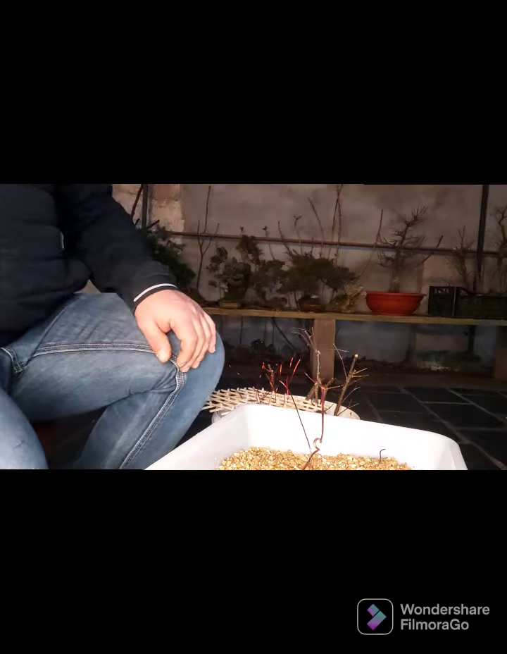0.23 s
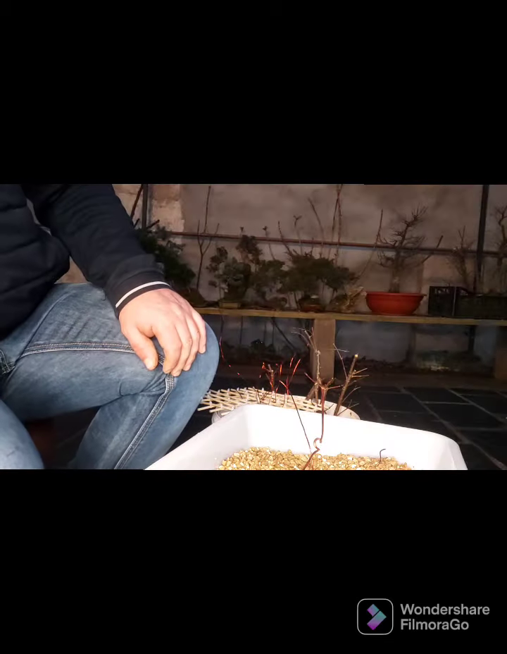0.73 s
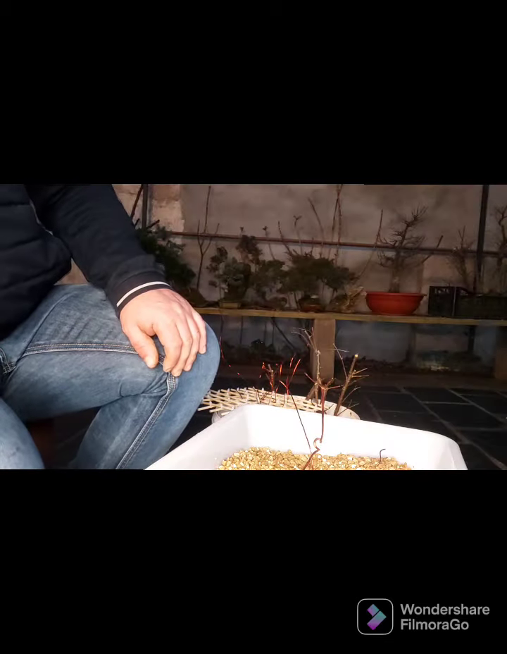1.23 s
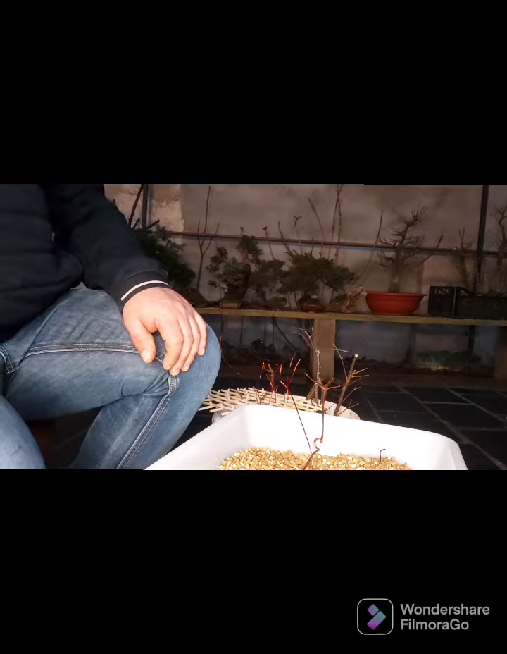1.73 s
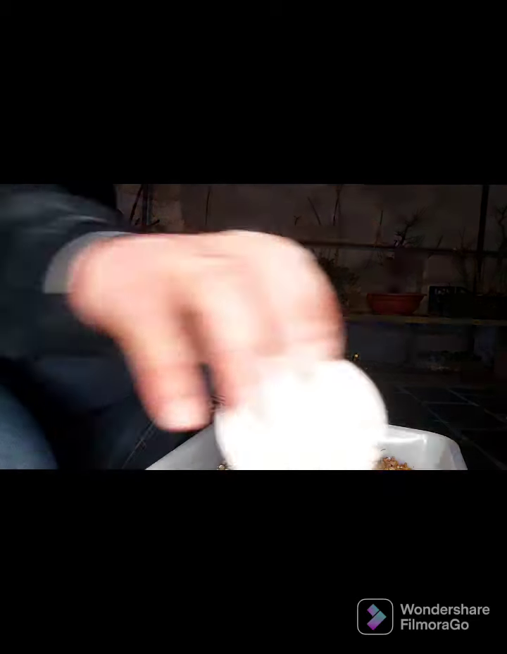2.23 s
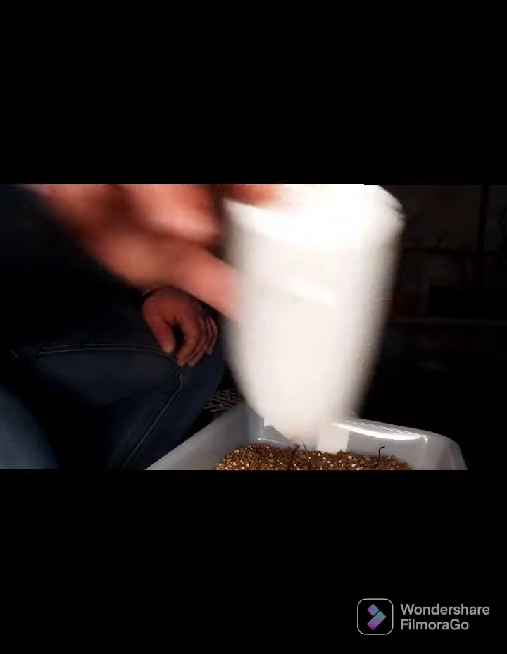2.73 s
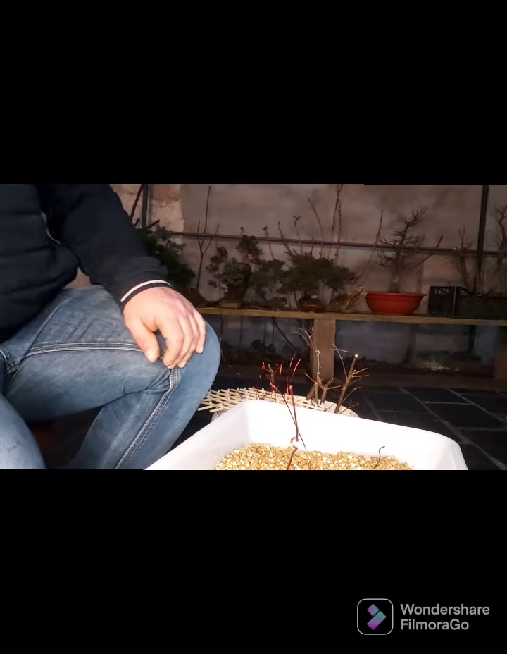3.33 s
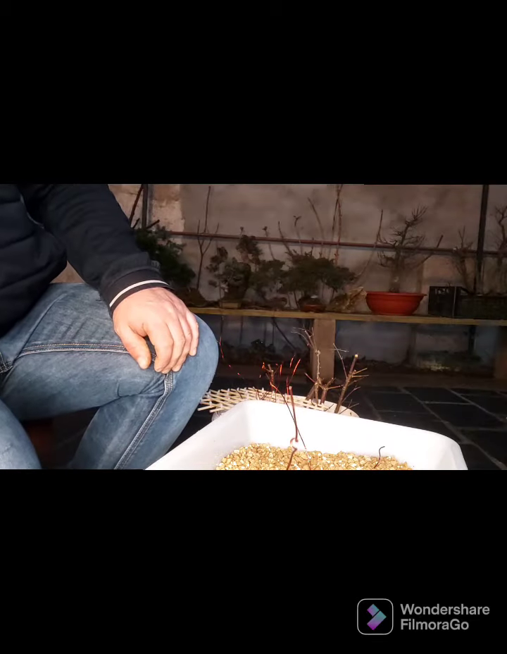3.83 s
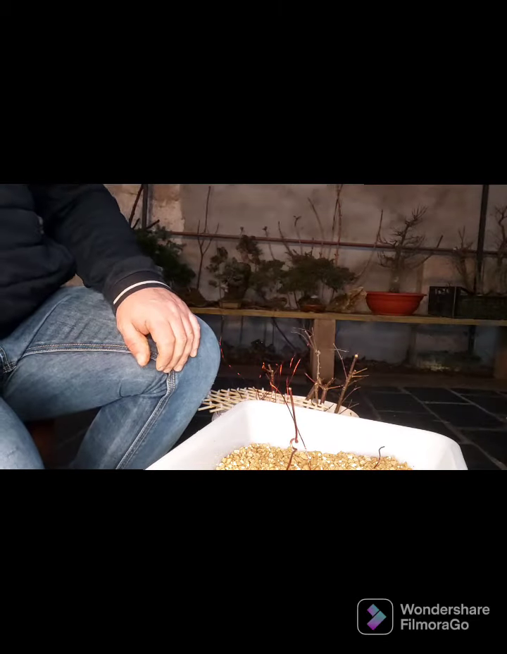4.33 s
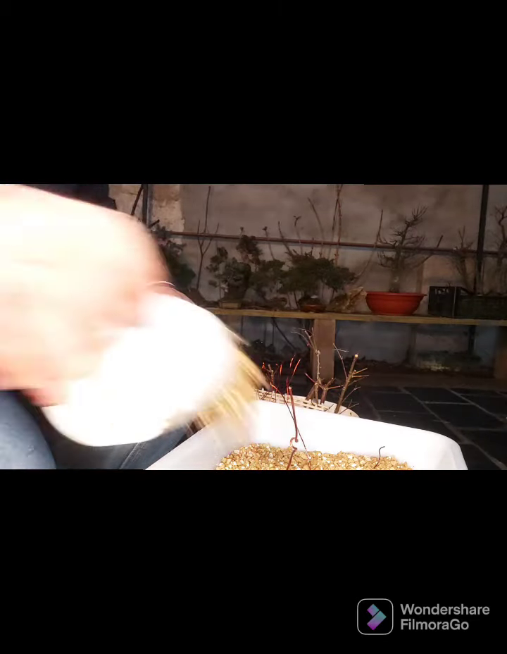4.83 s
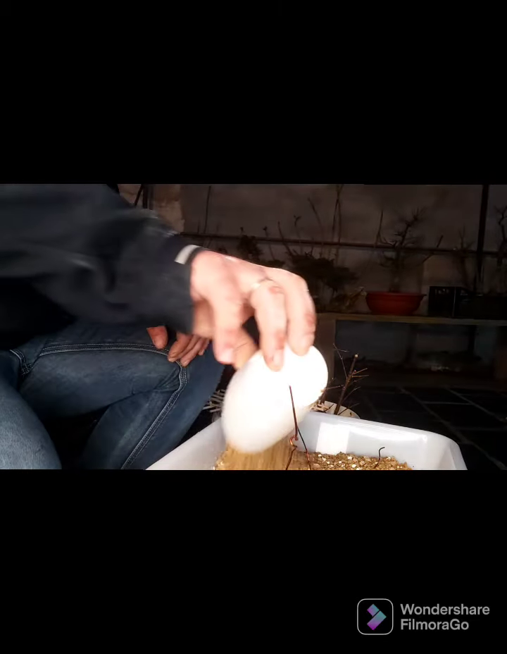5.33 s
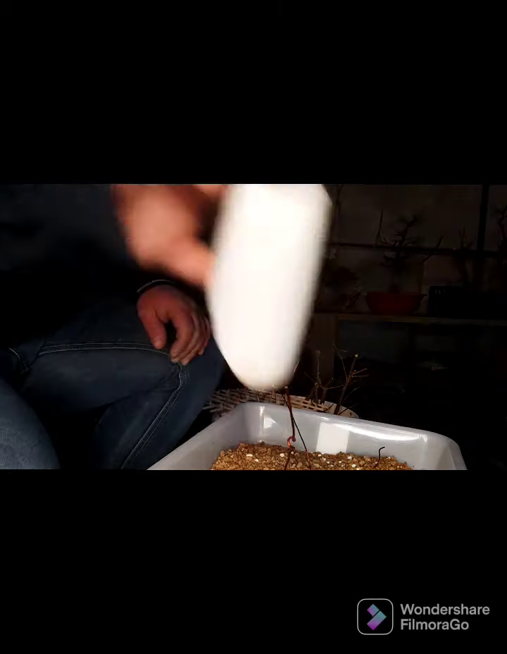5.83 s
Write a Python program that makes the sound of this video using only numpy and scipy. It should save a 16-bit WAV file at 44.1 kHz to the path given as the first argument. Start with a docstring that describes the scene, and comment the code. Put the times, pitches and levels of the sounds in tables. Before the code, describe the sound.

Two rounds of digging coarse dry grit with a hollow plastic scoop and pouring it out in a rattling rush and fading hiss, in a quiet room.

```python
"""Scooping gritty granules, twice over

A plastic scoop crunches into a tub on the left: clumped random collisions, a moving boom and modal knocks.
It trickles as it is carried, then tips into a plastic tray in front: a rattling rush, then a soft hiss
as the rest slides out, both made of dense collisions. Single noise cracks are the hard hits.
Filtered noise is the quiet room, with a low hum that fades away.
"""
import sys
import numpy as np
from scipy import signal
from scipy.fft import rfft, irfft, next_fast_len
from scipy.io import wavfile

SR = 44100
rng = np.random.default_rng(int(sys.argv[2]) if len(sys.argv) > 2 else 0)


def bounce(signal):
    """Save signal as a 16-bit WAV file at the path given by the first command-line argument."""
    frames = np.transpose(np.atleast_2d(signal))
    limited = np.clip(frames, -1, 1)
    pcm = np.round(limited * 32767).astype(np.int16)
    wavfile.write(sys.argv[1], SR, pcm)


N = 267775
TIME = np.arange(N) / SR

# In every pan_db column, positive is louder on the left. Levels are relative, ahead of the room and the final mix.

# dull background with a hum that fades away: start_s, air_db, rumble_db, hum_db
BACKGROUND = [(0, -43, -48, -43.5), (0.5, -48.5, -54, -50.5), (1.3, -47, -50.5, -48),
              (1.7, -49, -50.5, -53), (2.1, -50.5, -46, -52), (2.35, -50, -51, -62), (3.4, -51.5, -47, -62),
              (4.3, -51.5, -53, -61.5), (6.07, -50.5, -50.5, -69)]
# colour of the room: pitch_hz, gain_db
ROOM_COLOUR = [(15, -44), (32, -20), (39, 5), (45, 11.5), (62, 3), (110, -11.5), (146, -5), (190, -5.5),
               (264, -9), (480, -15), (978, -10), (2600, -24), (3300, -34), (8100, -34.5), (15000, -78.5)]
# side of the room: pitch_hz, pan_db
ROOM_SIDE = [(60, 9.5), (150, 11.5), (380, 8), (950, 7.5), (1800, 4.5), (3200, 1), (6500, -0.5),
             (8300, 15.5), (15000, -18)]
# how alike the two ears are in the room: pitch_hz, likeness (-1 to 1)
ROOM_LIKENESS = [(60, 0.78), (180, 1), (550, 0.15), (1000, -0.37), (1700, 0.32), (4000, -0.33)]
HUM_HZ = 95.1

# sways of the carried scoop that shift its loose granules: peak_s, level_db
SWAYS = [(0.03, -52.5), (0.5, -63.5), (1.2, -55), (1.45, -55), (2.23, -52), (3.41, -63), (4.13, -53),
         (4.37, -54), (4.97, -58)]
# colour of the loose granules in the scoop: pitch_hz, gain_db
TRICKLE_COLOUR = [(1800, -14.5), (3000, -6.5), (5200, -9.5), (6800, -2), (8230, 1), (8950, -6.5),
                  (9730, -17.5), (15000, -28)]
# side of the loose granules in the scoop: pitch_hz, pan_db
TRICKLE_SIDE = [(2000, 5), (4500, 3.5), (6700, -2), (8300, 14.5), (10500, 16.5), (15000, 3)]
SWAY_RISE_DB_PER_S, SWAY_FALL_DB_PER_S = 52, 50
STRAY_PER_S, STRAY_DB = 22, -5.0  # lone granules hopping in the scoop, relative to the trickle

# single hard granule hits: start_s, level_db, pan_db, hollow_db, top_db (above TOP_HZ)
HITS = [(0.033, -33.5, -4, 15.5, -13), (0.078, -18, 4.5, -1, -11), (0.185, -20.5, 6, -8, 2),
        (0.533, -35, 11, -19, 10), (0.574, -35, 9, -8, 2), (0.604, -29.5, 8, -21, 4),
        (0.6236, -28, 12, -16, -6), (0.6459, -11, 4, -17, -9), (0.662, -31, 10, -17, -9),
        (0.6825, -21, 7, -12, -9), (0.696, -11, 14, -11, -9), (0.7422, -7, 6, -15, -12),
        (0.7514, -8, 5, 3, -15), (0.9077, -28, 5, 0, -6), (0.921, -23, 4, 3, -6), (0.954, -17, 12, -2, -3),
        (0.939, -21.5, 8, 8, 6), (1.093, -29, 6, 7, -3), (1.2646, -36, -2, -4, 2), (1.4333, -34, 17, -6, 5),
        (1.4612, -37, -2, -1, 6), (1.477, -46, 10, -6, 2), (1.506, -40, 17, -12, 13),
        (1.5524, -45, 18, -10, 16), (1.6128, -44, 16, -10, 13), (1.628, -45, 12, -10, 7),
        (1.6414, -37.5, 14, -6, 6), (1.6863, -44, 10, -1, 6), (1.695, -39, 13, -10, 9),
        (1.7322, -42.5, 15, -10, 14), (1.8085, -42, 17, -6, 11), (1.841, -46, 14, -8, 2),
        (1.9281, -53, 13, -8, 2), (2.243, -25, 0, -3, 4), (2.249, -10, 6, -2, 10.5),
        (2.266, -4, -11, 2, -3), (2.2712, -6, -1, 3.5, -5), (2.2832, -7.5, -11, 5, 5),
        (2.3055, -13, 2, 4, 10.5), (2.3395, -17.5, 5, 17, 5), (2.3628, -30, 7, 21.5, 4),
        (2.4254, -14.5, 6, 1.5, 10), (2.583, -21, 2, -6, -0.5), (2.651, -27.5, -4, -10, -4),
        (2.697, -34, -9, -18, -3), (2.7222, -22, -14, -6, -2.5), (2.873, -38, 3, 6, 10),
        (2.886, -55, 0, 3, 0), (2.901, -37, 3, -5, -1), (3.011, -44.5, -6, -4, -7), (3.4305, -8, 11, 1, -9),
        (3.5642, -10, 10, -36, -7), (3.571, -16, -1, -19, -13), (3.6249, -6.5, 14, -9, -15),
        (3.634, -8.5, 9, -6, -10), (3.669, -17, 7, -1, -9), (3.843, -17.5, 9, 5, -4),
        (4.008, -32, 7, -1, -6), (4.3245, -40, 8, 4, 13), (4.5967, -46, 19, -8, 14),
        (4.6393, -45, 15, -12, 17), (4.863, -42, 15, -8, 2), (4.9227, -37, 6, -6, -6),
        (4.9364, -33, 7, 10, 9), (4.9638, -36, -4, 4, -7), (5.011, -25, 10, 7, -6),
        (5.0288, -17.5, 1, 8, 2), (5.038, -18, 15, -17, -3), (5.0498, -15, -9, 8, -4),
        (5.0613, -6, 2, 4, 0), (5.0769, -14, 3, -6, 2), (5.084, -8.5, 2, -26, 6), (5.092, -13, 8, -10, 5),
        (5.0973, -16.5, 4, -9, 4), (5.102, -27, -1, 16, 4), (5.135, -21, 11, -5, -6),
        (5.159, -26, -3, 7, 9), (5.197, -16.5, -3.5, -0.5, 4), (5.3268, -28.5, 8, -18, 5),
        (5.35, -25, 4, -7, -5), (5.375, -25, 6, -16, 6), (5.541, -31, 1, 0, 0), (5.582, -17, 1, -2, 1),
        (5.68, -27, -2, -6, -4)]
# air column of the scoop: pitch_hz, width_hz, level_db
SCOOP_MODES = [(602, 85, 5.5), (1113, 120, 8.5), (1690, 350, 3), (2223, 180, -3.5)]
SCOOP_PITCH_SPREAD = 0.026  # the air resonances shift with the load and the hand, from hit to hit
CROSSOVER_HZ, TOP_HZ = 2000, 10000  # hollow below and gritty above the first; top above the second

# pushes of the scoop through the heap in the tub:
# start_s, length_s, crunch_db, boom_db, grit_db, grit_fall_db_per_s
STROKES = [(0.645, 0.13, -31.5, -27, -22.5, 596), (0.792, 0.14, -37, -38, -33.5, 74.5),
           (0.893, 0.046, -35.5, -53, -28.5, 188), (1.058, 0.061, -47.5, -44, -42.5, 153),
           (3.481, 0.036, -46, -53, -39.5, 900), (3.556, 0.12, -37, -26.5, -24.5, 417),
           (3.662, 0.19, -32.5, -48.5, -30, 98), (3.8, 0.019, -46, -34.5, -37, 110)]
# the hollow between scoop and heap sinks in pitch as the scoop goes in and rises as it lifts: time_s, pitch_hz
BOOM_PITCH = [(0.66, 855), (0.71, 824), (0.77, 750), (0.83, 614), (0.87, 806), (0.94, 1140), (1.03, 800),
              (3.51, 900), (3.62, 860), (3.71, 760), (3.81, 584), (3.845, 1080), (3.87, 1020), (3.91, 740)]
# colour of the tub: pitch_hz, gain_db
DIG_COLOUR = [(59, -36), (110, -25.5), (165, -9), (230, -4), (320, -13), (410, -5), (610, -9), (760, -6.5),
              (1000, -4.5), (1400, -9), (2050, -8), (2750, -8.5), (3800, -12.5), (5000, -10), (6100, -11),
              (6850, -3.5), (7450, -8), (8250, -2.5), (8850, -9), (9800, -22.5), (16000, -43.5)]
# side of the tub: pitch_hz, pan_db
DIG_SIDE = [(60, 8.5), (200, 19), (650, 11.3), (1290, 11.7), (2400, 8), (4400, 7.8), (6700, 1.6),
            (8300, 22), (10500, 4.7), (15000, 14)]
GRIT_ATTACK_S, CRUNCH_ATTACK_S = 0.022, 0.054  # the surface grinds at once; the heap takes longer to give
CRUNCH_RELEASE_DB_PER_S = 327
AFTERSLIP_DB, AFTERSLIP_DB_PER_S = -15.5, 37  # the heap goes on slumping after a push
STONES_PER_S, STONES_DB = 150, -2.5  # larger stones knocking in the heap, relative to the fine grinding
NEAR_WALL_S = 0.008  # range of echo delays between the plastic walls
SCOOP_MOVES_HZ = 2.5  # rate of the drift in those echoes

# the scoop knocking on plastic and jolting through the heap:
# start_s, level_db, contact_s, pitch_ratio (of the spot struck), pan_db
KNOCKS = [(0.650, -25.5, 0.0014, 0.92, 15), (0.683, -23, 0.00064, 0.94, 15),
          (0.709, -20.5, 0.00073, 0.91, 15), (0.726, -19, 0.00054, 0.91, 15),
          (0.743, -28.5, 0.0012, 0.88, 15), (0.769, -15, 0.0015, 0.846, 16), (0.826, -22, 0.002, 0.63, 15),
          (0.937, -25, 0.0011, 1.23, 12), (3.431, -28, 0.00063, 1.14, 20), (3.437, -19.5, 0.0019, 0.93, 14),
          (3.5095, -22, 0.00042, 0.9, 15), (3.564, -25.5, 0.00041, 0.88, 15),
          (3.627, -17.5, 0.001, 0.93, 16), (3.661, -14, 0.0016, 1.17, 17),
          (5.0671, -30.5, 0.00069, 0.71, 6), (5.1605, -36, 0.00073, 0.75, 6),
          (5.617, -35.5, 0.00074, 0.94, 8)]
# ringing of the plastic tub and tray: pitch_hz (before the ratio), level_db, t60_s
TUB_MODES = [(206, -16, 0.15), (740, -18, 0.023), (922, -3, 0.03), (1000, -7.5, 0.049)]

# rushes of granules out of the tipped scoop:
# start_s, rise_s, length_s, patter_db, grit_db, patter_fall_db_per_s, grit_fall_db_per_s
RUSHES = [(2.243, 0.037, 0.042, -30.5, -23, 75, 230), (2.34, 0.079, 0.097, -56, -43.5, 90, 220),
          (2.676, 0.1, 0.085, -44, -37, 119, 154), (5.024, 0.046, 0.056, -37.5, -28, 260, 476),
          (5.12, 0.039, 0.047, -49.5, -45, 200, 301), (5.32, 0.037, 0.026, -68, -44, 103, 96),
          (5.488, 0.089, 0.095, -54, -36, 42.5, 109)]
# the rest of the load sliding out: start_s, fullest_s, hold_s, fall_10_db_s (sign has no effect),
# patter_db, grit_db, build_db_per_s, pan_db
SLIDES = [(2.269, 2.565, 0.12, -0.0468, -52, -34, 52, -3.5),
          (5.055, 5.586, 0.083, 0.14, -43, -34.5, 45.5, -0.5)]
# colour of the tray: pitch_hz, gain_db
POUR_COLOUR = [(88, -31), (170, -17.5), (376, -14), (600, -14.5), (1100, -11), (2300, -8), (3200, -4),
               (4950, -3), (7040, 5.5), (8600, 1.5), (10000, -18), (14800, -29), (16000, -50)]
# side of the tray: pitch_hz, pan_db
POUR_SIDE = [(200, 1), (600, 8.5), (1100, 5), (2000, 1.5), (4500, -1), (6700, -11.5), (8300, 8),
             (11000, 0.5)]
RUSH_PAN_DB = 7
PATTER_LAG_S = 0.061  # the scoop rings most when nearly empty
THIN_FLOW_PAN_DB = 6.5  # a thin stream falls to the left of the full one
SURGE_DB, SURGE_HZ = 1.0, 14  # the load slips out in small uneven surges
PEBBLES_PER_S, PEBBLES_DB = 100, -3.5  # coarser pebbles in the stream, relative to the fine granules

# dull thuds of the whole plastic vessel taking a load: start_s, peak_db, pan_db
THUDS = [(2.259, -40, 7), (3.433, -22, 15), (5.057, -43.5, 1)]
THUD_HZ, THUD_SAG_HZ_PER_S, THUD_SWELL_S, THUD_WIDTH_S = 208, 1100, 0.015, 0.0092

CUTOFF_HZ = 16000


def from_db(db):
    """Decibels to gain."""
    return 10 ** (np.asarray(db) / 20)


def rms(x):
    """Effective level, never quite zero."""
    return np.sqrt(np.mean(x ** 2) + 1e-20)


def unit(x):
    """Scale a stereo pair so that the mean of its ears has rms 1."""
    return x / rms(x.mean(axis=0))


def at_hz(points, hz):
    """Read a table of pitch_hz and value on a log axis."""
    known_hz, value = np.transpose(points)
    return np.interp(np.log(hz + 1), np.log(known_hz), value)


def in_time(rows):
    """Each column of a table as a curve over time."""
    s, *columns = np.transpose(rows)
    return [np.interp(TIME, s, column) for column in columns]


def panned(db):
    """Left and right gains with a mean of 1."""
    left = 2 / (1 + from_db(-np.atleast_1d(db)))
    return np.array([left, 2 - left])


def drift(rate_hz):
    """Slow chance with rms 1: noise through two equal low-pass poles, drawn at every 40th sample."""
    r = np.exp(-80 * np.pi * rate_hz / SR)
    noise = rng.standard_normal(N // 40 + 2002)
    slow = signal.lfilter([1], [1, -2 * r, r * r], noise)[2000:]  # skip the filter's start-up
    return np.interp(np.arange(N) / 40, np.arange(len(slow)), slow / rms(slow))


def coloured(x, colour, side):
    """Causal (minimum-phase) filter for each ear, built by folding the cepstrum."""
    size = 2 * next_fast_len(N // 2 + SR // 8)
    hz = np.arange(size // 2 + 1) * SR / size
    gain = from_db(at_hz(colour, hz)) * panned(at_hz(side, hz))
    cepstrum = irfft(np.log(gain))
    cepstrum[:, 1:size // 2] *= 2
    cepstrum[:, size // 2 + 1:] = 0
    response = np.exp(rfft(cepstrum))
    return irfft(rfft(x, size) * response)[:, :N]


def split(x):
    """Hollow lows and gritty highs."""
    filters = [signal.butter(2, CROSSOVER_HZ, kind, fs=SR, output="sos") for kind in ("low", "high")]
    return [signal.sosfilt(np.vstack([sos, sos]), x + 1e-18) for sos in filters]


def together(levels):
    """Unrelated sounds add in power."""
    return np.sqrt(sum(level ** 2 for level in levels))


def background(hum_pan_db=8.0, waver=0.00907, rumble_hz=90):
    """Dull steady air, a slowly swelling rumble and a wavering low hum with a weak octave."""
    air_db, rumble_db, hum_db = in_time(BACKGROUND)
    mid, side = rfft(rng.standard_normal((2, N)))
    alike = np.clip(at_hz(ROOM_LIKENESS, np.arange(len(mid)) * SR / N), -1, 1)
    noise = irfft(np.sqrt(1 + alike) * mid + np.sqrt(1 - alike) * side * [[1], [-1]], N)
    noise = coloured(noise, ROOM_COLOUR, ROOM_SIDE)
    rumble, air = [unit(signal.sosfilt(signal.butter(3, rumble_hz, kind, fs=SR, output="sos"), noise))
                   for kind in ("low", "high")]
    phase = 2 * np.pi * np.cumsum(HUM_HZ * (1 + waver * drift(3.4))) / SR
    hum = np.sqrt(2) * (np.sin(phase) + from_db(-7.5) * np.sin(2 * phase))
    hum = hum * from_db(1.8 * drift(4.6))
    return from_db(air_db) * air + from_db(rumble_db) * rumble + from_db(hum_db) * hum * panned(hum_pan_db)


def grains(per_s, size_db, clump_db, lag_ms, scatter_ms):
    """Random collisions, in clumps; each has its own size and place, so its own delay to the right ear."""
    at = np.flatnonzero(rng.random(N) < per_s / SR)
    spread_db = size_db * np.minimum(rng.exponential(1, N), 4)
    sizes = from_db(spread_db + clump_db * drift(85)) * rng.choice([-1, 1], N)
    lag = np.round((lag_ms + scatter_ms * rng.standard_normal(N)) * SR / 1000).astype(int)
    right_at = np.clip(at + lag[at], 0, N - 1)
    return np.array([np.bincount(where, sizes[at], N) for where in (at, right_at)])


def near_walls(x, echo_db, count=6):
    """A few very short echoes from the plastic walls give a ribbed colour that shifts as the scoop moves."""
    out = x.copy()
    for place in rng.random(count):
        lag = 1 + int((0.15 + place) * NEAR_WALL_S * SR)
        strength = np.tanh(2 * drift(SCOOP_MOVES_HZ))
        out[:, lag:] += from_db(echo_db) * strength[lag:] * x[:, :-lag]
    return unit(out)


def swell(peak_s, rise_db_per_s, fall_db_per_s):
    """Grows to 1 and dies away, each at a steady rate."""
    t = TIME - peak_s
    return from_db(-np.abs(t) * np.where(t < 0, rise_db_per_s, fall_db_per_s))


def trickling():
    """Small dry ticks as the load shifts around each sway, with a few louder strays."""
    clicks = grains(per_s=1300, size_db=1.5, clump_db=1.8, lag_ms=0.26, scatter_ms=0.12)
    strays = grains(per_s=STRAY_PER_S, size_db=1.0, clump_db=0.0, lag_ms=0.32, scatter_ms=0.12)
    granules = unit(clicks) + from_db(STRAY_DB) * unit(strays)
    _, grit = split(coloured(granules, TRICKLE_COLOUR, TRICKLE_SIDE))
    level = together(from_db(db) * swell(s, SWAY_RISE_DB_PER_S, SWAY_FALL_DB_PER_S) for s, db in SWAYS)
    return level * near_walls(grit, echo_db=-4.0)


def through_scoop(x, mix_db, pitch=1):
    """The open scoop adds its air resonances."""
    out = x
    for hz, width_hz, db in SCOOP_MODES:
        b, a = signal.iirpeak(hz * pitch, hz / width_hz, fs=SR)
        out = out + from_db(db + mix_db) * signal.lfilter(b, a, x + 1e-18)
    return out


def hard_hits(t60=0.02, gain_db=-2.15164, attack_s=0.00069, spread=1.0):
    """A granule strikes plastic: a noise crack that dies in a few milliseconds and rings the scoop."""
    t = TIME[:SR // 16]
    decay = np.minimum(t / attack_s, 1) * from_db(-60 * t / t60)
    below_top = signal.butter(8, TOP_HZ, fs=SR, output="sos")
    above_top = signal.butter(8, TOP_HZ, "high", fs=SR, output="sos")
    out = np.zeros((2, N))
    noises = rng.standard_normal((len(HITS), 3, len(t)))  # one shared by the ears, one for each ear
    for (s, db, pan_db, hollow_db, top_db), noise in zip(HITS, noises):
        crack = (noise[0] + spread * noise[1:]) / np.hypot(1, spread) * decay
        hollow, sharp = split(crack * from_db(db + gain_db) * panned(pan_db))
        top = from_db(top_db) * signal.sosfilt(above_top, sharp)
        sharp = signal.sosfilt(below_top, sharp) + top
        hit = sharp + from_db(hollow_db) * hollow.mean(axis=0)  # lows reach both ears alike
        at = round(s * SR)
        pitch = np.exp(SCOOP_PITCH_SPREAD * noise[0, 0])
        out[:, at:at + len(t)] += through_scoop(hit, mix_db=8.0, pitch=pitch)
    return coloured(out, POUR_COLOUR, POUR_SIDE)


def stone_rings(clicks, ring_db, low_hz, high_hz, count=3000):
    """Some granules chink briefly at random moments, each at its own pitch, strength and place."""
    t = TIME[:SR // 50]
    when, pitch, size, place = rng.random((count, 4)).T[:, :, None]
    hz = low_hz + (high_hz - low_hz) * pitch
    waves = from_db(12 * size - 60 * t / 0.028) * np.sin(2 * np.pi * hz * t)
    at = (when * (N - len(t))).astype(int) + np.arange(len(t))
    rings = np.array([np.bincount(at.ravel(), (waves * np.cos(np.pi * place + ear)).ravel(), N)
                      for ear in (0, np.pi / 2)])
    return clicks + from_db(ring_db) * rings * rms(clicks) / rms(rings)


def stroke(start, length, attack_s, release_db_per_s):
    """Linear attack, hold, then a release at a steady rate."""
    t = TIME - start
    return np.clip(t / attack_s, 0, 1) * from_db(-release_db_per_s * np.maximum(t - length, 0))


def moving_resonance(x, hz, width_hz):
    """A resonance whose centre follows a curve: shift it down to zero, smooth, shift back."""
    turn = np.exp(2j * np.pi * np.cumsum(hz) / SR)
    r = np.exp(-np.pi * width_hz / SR)
    return np.real(turn * signal.lfilter([1 - r], [1, -r], x / turn))


def digging(boom_width_hz=230):
    """The scoop shears the heap: fine dense grinding, and coarser slips that boom in a hollow of moving pitch."""
    slips = grains(per_s=3500, size_db=2.5, clump_db=2.2, lag_ms=0.46, scatter_ms=0.02)
    grinding = grains(per_s=5000, size_db=1.5, clump_db=2.2, lag_ms=0.42, scatter_ms=0.05)
    stones = grains(per_s=STONES_PER_S, size_db=1.0, clump_db=0.0, lag_ms=0.42, scatter_ms=0.08)
    grinding = unit(grinding) + from_db(STONES_DB) * unit(stones)
    grinding = stone_rings(grinding, ring_db=-9.0, low_hz=2120, high_hz=9510)

    crunch = unit(split(coloured(slips, DIG_COLOUR, DIG_SIDE))[0])
    boom = unit(moving_resonance(crunch, in_time(BOOM_PITCH)[0], boom_width_hz))
    grit = near_walls(split(coloured(grinding, DIG_COLOUR, DIG_SIDE))[1], echo_db=-1.5)

    pushes, booms, grinds = [], [], []
    for s, length, crunch_db, boom_db, grit_db, grit_fall in STROKES:
        push = stroke(s, length, CRUNCH_ATTACK_S, CRUNCH_RELEASE_DB_PER_S)
        afterslip = stroke(s, length, CRUNCH_ATTACK_S, AFTERSLIP_DB_PER_S)
        pushes.append(from_db(crunch_db) * push)
        booms += [from_db(boom_db) * push, from_db(boom_db + AFTERSLIP_DB) * afterslip]
        grinds.append(from_db(grit_db) * stroke(s, length, GRIT_ATTACK_S, grit_fall))
    return together(pushes) * crunch + together(booms) * boom + together(grinds) * grit


def knocks():
    """A short contact rings the plastic, pitched by the spot struck; a softer one favours its lowest mode."""
    t = TIME[:SR // 5]
    out = np.zeros((2, N))
    for s, db, contact, pitch, pan_db in KNOCKS:
        push = np.sin(np.pi * np.clip(t / contact, 0, 1)) ** 2
        ring = sum(from_db(mode_db - 60 * t / t60) * np.sin(2 * np.pi * hz * pitch * t)
                   for hz, mode_db, t60 in TUB_MODES)
        # the wall radiates the change of force
        knock = signal.fftconvolve(np.gradient(push), ring)[:len(t)]
        at = round(s * SR)
        out[:, at:at + len(t)] += from_db(db) * panned(pan_db) * knock
    return out


def falling(clicks, scoop_db):
    """Collisions in the mouth of the scoop and on the bed, as hollow patter and grit."""
    clicks = stone_rings(clicks, ring_db=-9.0, low_hz=1866, high_hz=9173)
    patter, grit = split(coloured(through_scoop(clicks, scoop_db), POUR_COLOUR, POUR_SIDE))
    return unit(patter), near_walls(grit, echo_db=-4.5)


def outflow(fullest_s, hold_s, emptying_s, build_db_per_s):
    """The stream builds as the scoop tilts, holds, then runs out ever faster."""
    t = TIME - fullest_s
    build_db = build_db_per_s * np.minimum(t, 0)
    emptying_db = -10 * (np.maximum(t - hold_s, 0) / emptying_s) ** 2
    return from_db(build_db + emptying_db)


def pouring():
    """The first rush booms in the mouth of the scoop; the rest slides out and scatters widely over the bed."""
    rush = grains(per_s=3300, size_db=2.5, clump_db=0.0, lag_ms=-0.1, scatter_ms=0.049)
    rush_patter, rush_grit = falling(rush, scoop_db=8.5)
    slide = grains(per_s=1800, size_db=1.8, clump_db=1.0, lag_ms=-0.06, scatter_ms=0.15)
    pebbles = grains(per_s=PEBBLES_PER_S, size_db=0.8, clump_db=0.0, lag_ms=-0.06, scatter_ms=0.15)
    slide = unit(slide) + from_db(PEBBLES_DB) * unit(pebbles)
    surges = from_db(SURGE_DB * drift(SURGE_HZ))
    slide_patter, slide_grit = falling(slide * surges, scoop_db=-6.5)

    out = 0
    for s, rise_s, length, patter_db, grit_db, patter_fall, grit_fall in RUSHES:
        out = out + from_db(patter_db) * stroke(s, length, rise_s, patter_fall) * rush_patter
        grit = from_db(grit_db) * stroke(s, length, rise_s, grit_fall) * rush_grit
        out = out + grit * panned(RUSH_PAN_DB)
    for tipped_s, fullest_s, hold_s, emptying_s, patter_db, grit_db, build, full_pan_db in SLIDES:
        flow = outflow(fullest_s, hold_s, emptying_s, build)
        pan_db = THIN_FLOW_PAN_DB + (full_pan_db - THIN_FLOW_PAN_DB) * flow ** 2
        grit = from_db(grit_db) * flow * panned(pan_db) * slide_grit
        late_flow = outflow(fullest_s + PATTER_LAG_S, hold_s, emptying_s, build)
        patter = from_db(patter_db) * late_flow * slide_patter
        out = out + (TIME > tipped_s) * (grit + patter)
    return out


def thuds():
    """The vessel's floor flexes for a few cycles, swelling and sagging in pitch."""
    out = 0
    for s, db, pan_db in THUDS:
        t = np.maximum(TIME - s, 0)
        flex = np.sin(2 * np.pi * (THUD_HZ - THUD_SAG_HZ_PER_S * t / 2) * t)
        bump = np.exp(-((t - THUD_SWELL_S) / THUD_WIDTH_S) ** 2)
        out = out + from_db(db) * bump * flex * panned(pan_db)
    return out


def room(x, t60=0.19, wet_db=-10.0, wall_hz=6000):
    """A faint, dull tail from the walls: decaying noise after a 5 ms gap."""
    t = TIME[:SR // 2]
    tail = rng.standard_normal((2, len(t))) * from_db(-60 * t / t60) * (t > 0.005)
    tail = tail / np.sqrt(np.sum(tail ** 2) / 2)
    tail = signal.sosfilt(signal.butter(1, wall_hz, fs=SR, output="sos"), tail)
    return x + from_db(wet_db) * signal.fftconvolve(x, tail, axes=1)[:, :N]


def scene():
    """All the handling in the room, over the background."""
    handling = digging() + pouring() + trickling() + hard_hits() + knocks() + thuds()
    return room(handling) + background()


def record(dry):
    """Peaks are rounded, the top is cut."""
    rounded = np.tanh(dry)
    return signal.sosfilt(signal.ellip(10, 0.1, 80, CUTOFF_HZ, fs=SR, output="sos"), rounded)


dry = scene()
out = record(dry)
bounce(out)
```